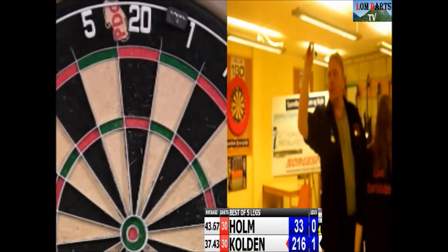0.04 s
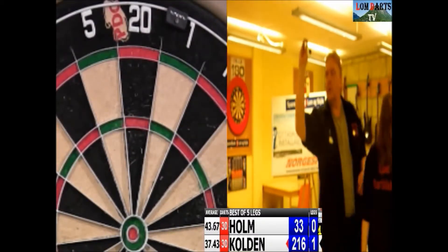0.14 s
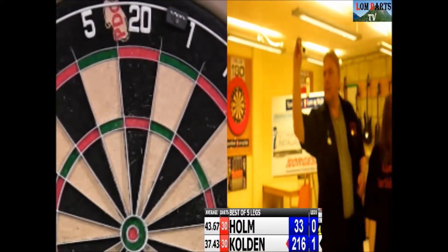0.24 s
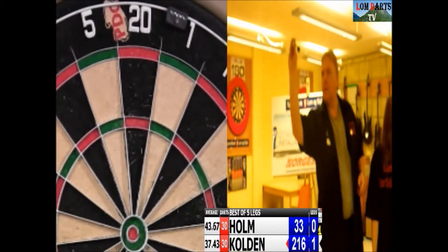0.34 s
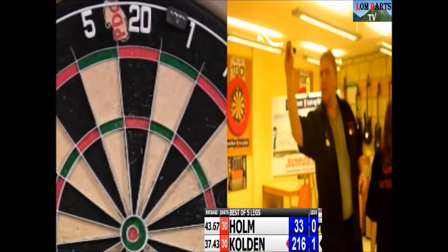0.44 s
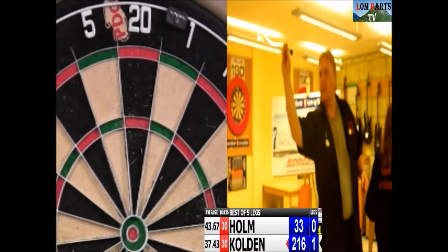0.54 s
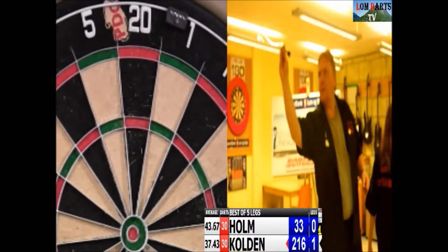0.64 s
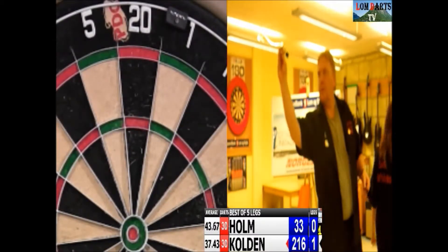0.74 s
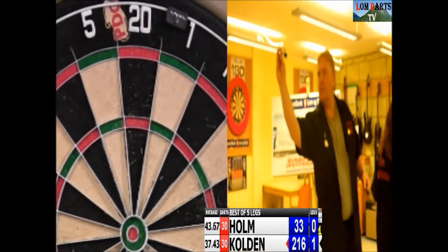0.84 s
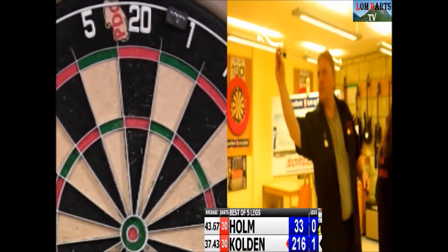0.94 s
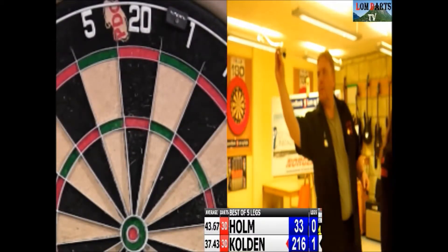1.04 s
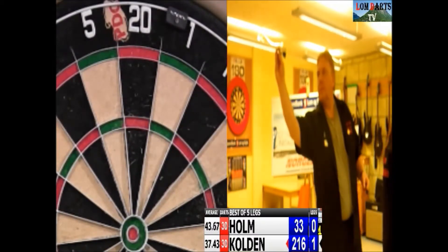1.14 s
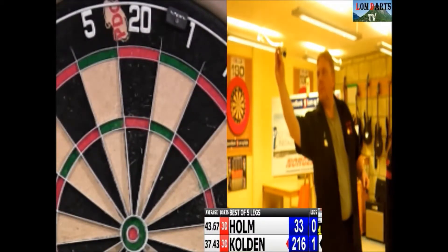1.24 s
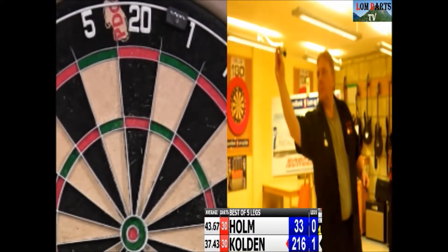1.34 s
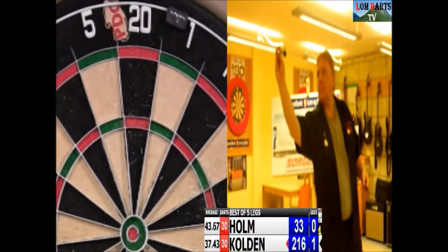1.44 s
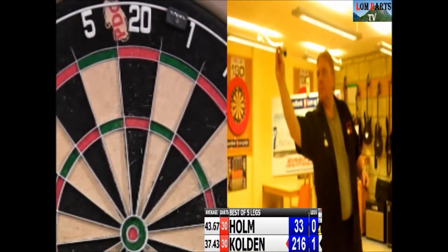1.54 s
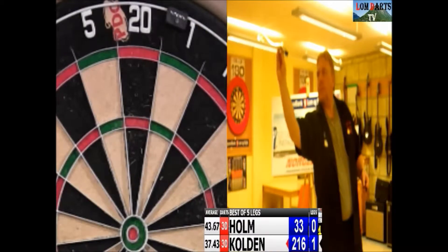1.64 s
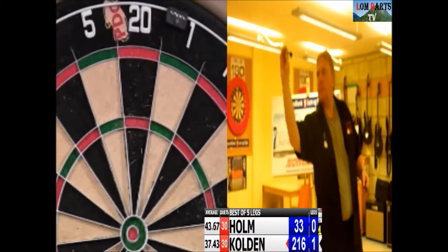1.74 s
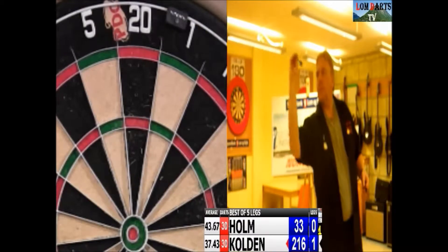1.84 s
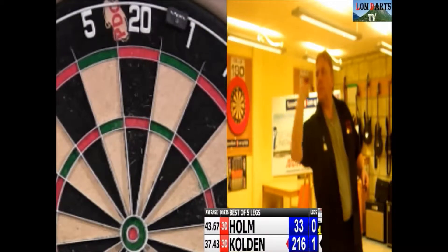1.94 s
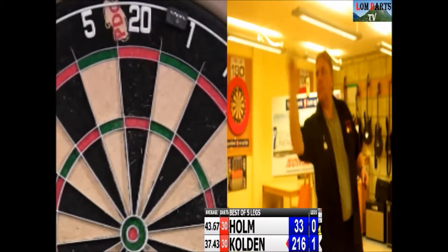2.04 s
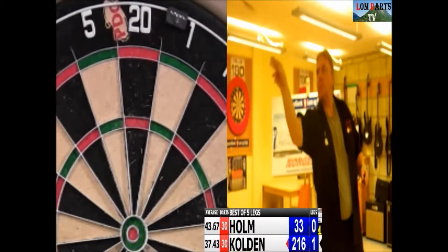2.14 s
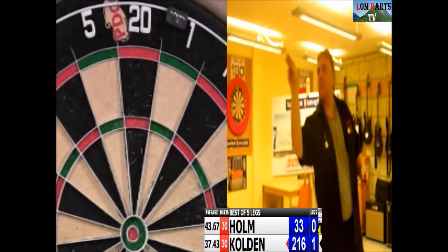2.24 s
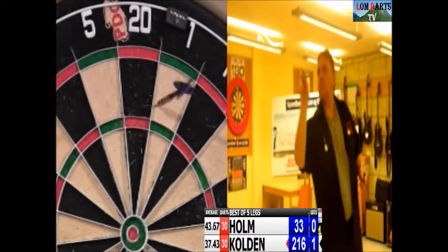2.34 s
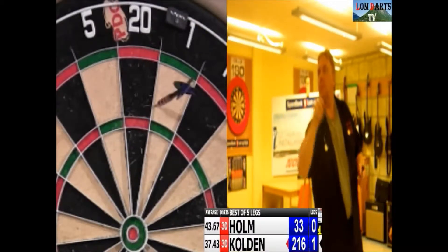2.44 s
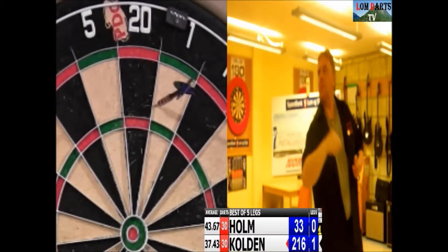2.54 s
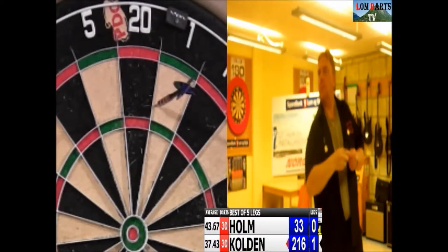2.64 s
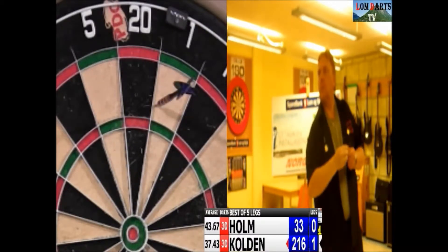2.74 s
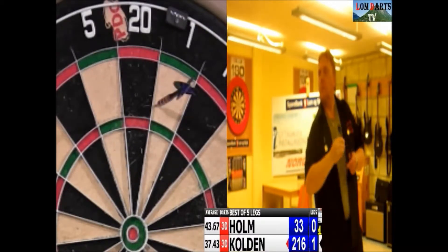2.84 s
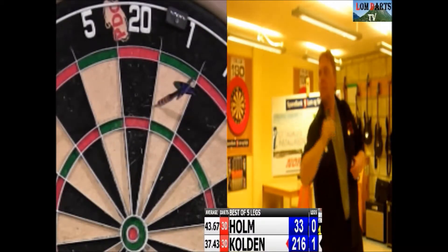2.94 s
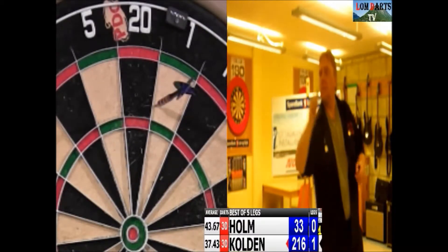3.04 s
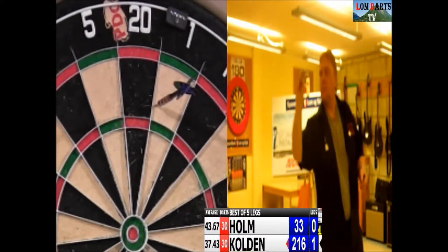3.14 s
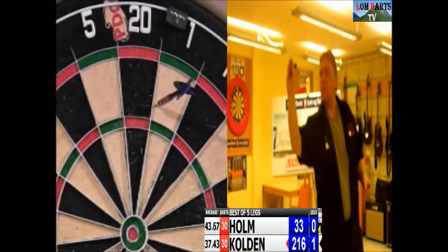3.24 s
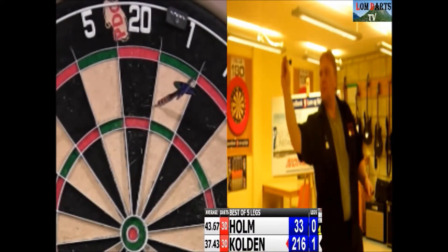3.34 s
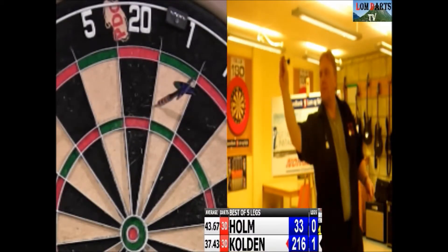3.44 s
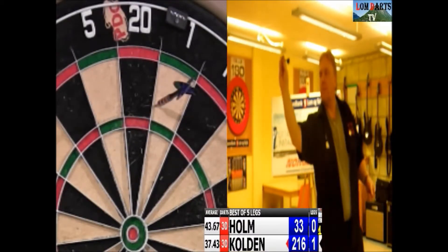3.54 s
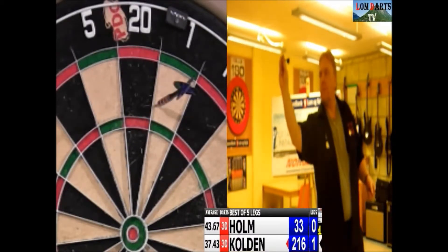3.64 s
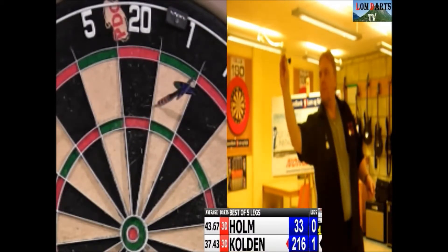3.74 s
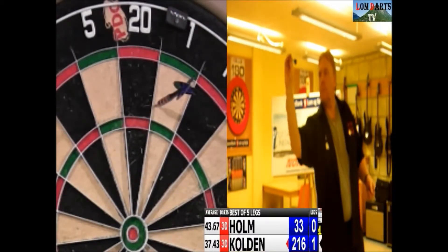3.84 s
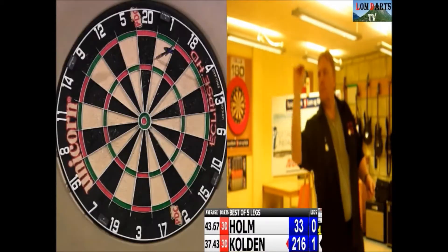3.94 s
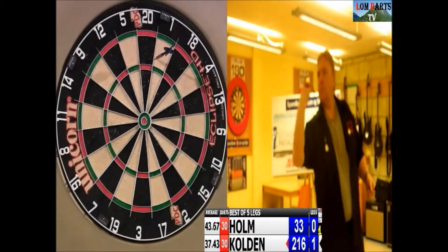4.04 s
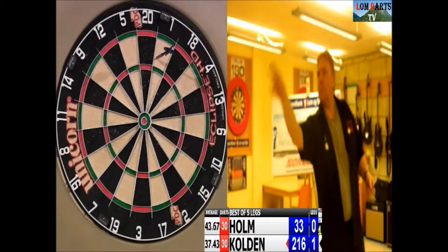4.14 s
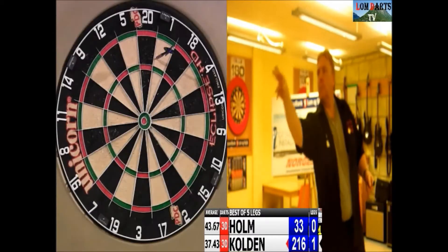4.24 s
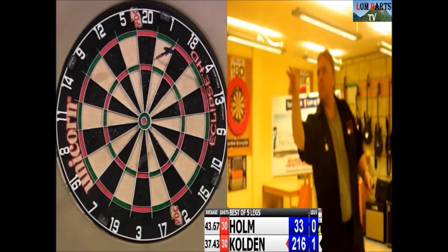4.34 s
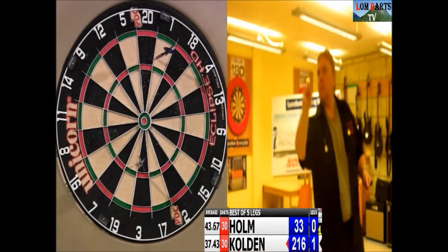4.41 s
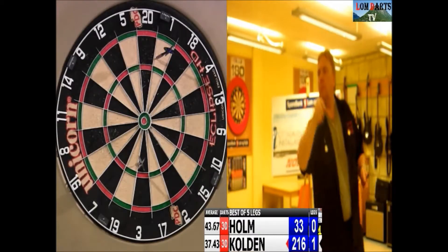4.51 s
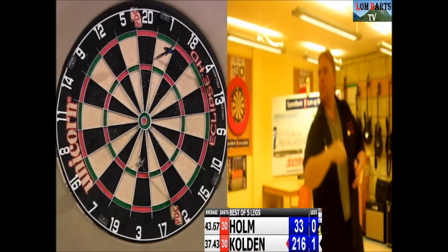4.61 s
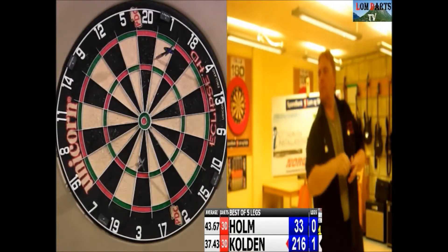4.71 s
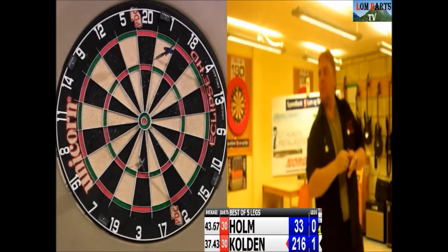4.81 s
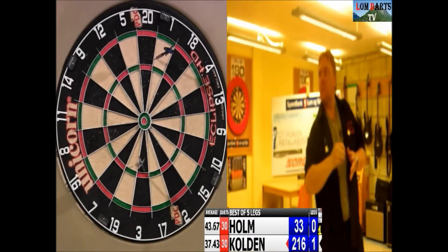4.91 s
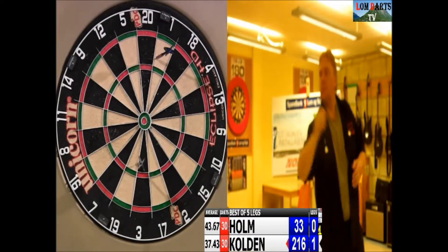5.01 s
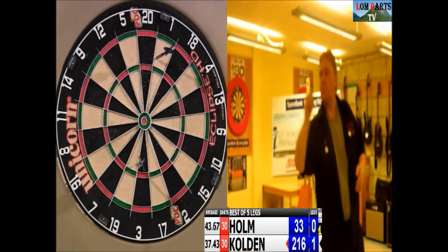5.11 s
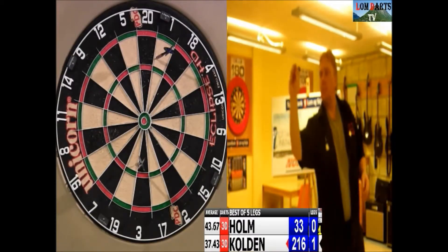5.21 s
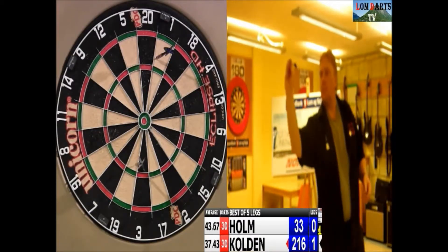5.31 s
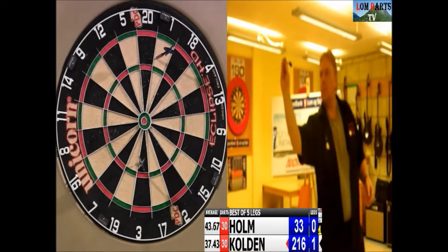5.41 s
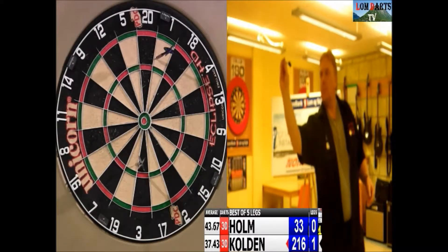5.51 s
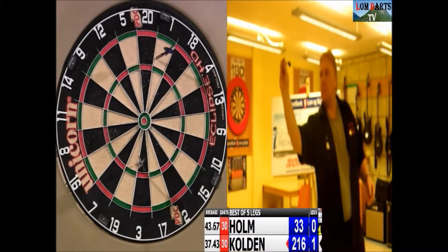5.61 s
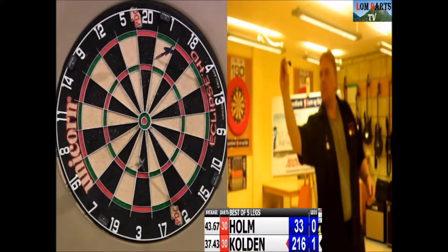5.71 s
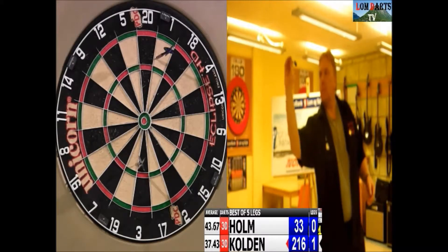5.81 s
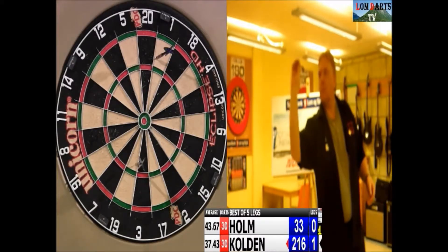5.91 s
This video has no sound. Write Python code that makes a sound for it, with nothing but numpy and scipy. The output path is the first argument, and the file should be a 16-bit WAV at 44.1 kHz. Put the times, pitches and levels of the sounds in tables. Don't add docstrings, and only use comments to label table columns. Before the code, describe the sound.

Close stereo pickup near a dartboard indoors: soft bustle and light taps settle as the thrower aims, then one loud short thock with a tiny metallic rattle and quick wall echoes. Sleeves rustle, a dart clicks in the hand, and a second thock follows with a low boom. Afterwards only fading cloth movement, faint taps, low hum and hushed room tone remain.

```python
import sys
import numpy as np
from scipy import signal
from scipy.io import wavfile

SR = 44100
rng = np.random.default_rng(int(sys.argv[2]) if len(sys.argv) > 2 else 0)


def ratio_of_db(decibels):
    return 10 ** (np.asarray(decibels, float) / 20)


def output_pcm(signal):
    pcm = np.clip(np.atleast_2d(signal).T, -1, 1) * 32767
    wavfile.write(sys.argv[1], SR, np.round(pcm).astype(np.int16))


N = 263232

LEAD = SR // 220
EDGES = 45 * 2 ** np.arange(0, 8.5, 1 / 3)
# f/Hz, left-right likeness/1
LIKENESS = [(60, 1), (180, 0.74), (530, 0.67), (1560, 0.88), (4610, 0.84), (13600, 0.38)]


def at_hz(points, hz):
    freqs, values = np.array(points).T
    return np.interp(np.log(hz), np.log(freqs), values)


def rms_one(x):
    return x / np.sqrt(np.mean(x ** 2) + 1e-20)


def butter(x, order, hz, kind="low"):
    return signal.sosfilt(signal.butter(order, hz, kind, fs=SR, output="sos"), x)


def ring(clicks, hz, t60):
    r = ratio_of_db(-60 / (t60 * SR))
    w = 2 * np.pi * hz / SR
    return signal.lfilter([0, np.sin(w)], [1, -2 * r * np.cos(w), r * r], clicks + 1e-18)


def bands(size, likeness):
    white = rng.standard_normal((2, 2, size))
    for k, (low, high) in enumerate(zip(EDGES, EDGES[1:])):
        mid, side = butter(white[k % 2], 2, [low, high], "band")
        hz = np.sqrt(low * high)
        alike = np.clip(at_hz(likeness, hz), 0, 1)
        yield hz, np.sqrt((1 + alike) / 2) * mid + np.sqrt((1 - alike) / 2) * side * [[1], [-1]]


def pan(db):
    return ratio_of_db(np.array([[db / 2], [-db / 2]]))


def dart_blow(blow_db):
    n = np.arange(SR)
    entry = ratio_of_db(-21.5) * rng.standard_normal(SR) * n / LEAD * (n < LEAD) / 4
    blow = ratio_of_db(blow_db) * (np.eye(1, SR, LEAD)[0] + entry)
    return butter(blow, 4, 3200)


def board(blow, soft_hz, k):
    # f/Hz, T60/s, level of first dart/dB, level of second dart/dB
    modes = [(85.2, .6, -28.5, -27), (151, 0.44, -20, -32), (215.5, 0.3, -17.5, -19.5),
             (261, 0.27, -7.5, -11), (307, 0.1, -9, -25), (357.5, 1, -11.5, -32), (375.7, 0.39, -3, -5),
             (406.5, 0.301, -10, 2.5), (471.4, .2, -7.5, 3), (529, 0.41, -7.5, 1), (582, 0.16, -12.5, 7),
             (657.5, 0.28, -1, -9), (720, 0.2, -19, -14), (895, 0.17, -28, 1.5), (927, 0.24, -8.5, -1.5),
             (1135, 0.14, -22, -16.5), (1195, 0.1, -6.5, -5), (1320, 0.12, -27, -8.5),
             (1756, .12, -13.5, -20), (1960, 0.125, -13, -17.5), (2306, 0.18, -18, -14.5),
             (2640, 0.1, -36, -17)]
    pulse_db, ring_db = 6.5, -5
    thud_t60_share = 0.13
    thud = ratio_of_db(pulse_db) * butter(blow, 4, soft_hz) * SR / soft_hz
    ringing = 0
    for n, (hz, t60, *db) in enumerate(modes):
        sign = (-1) ** n
        thud += sign * ratio_of_db(db[k]) * ring(blow, hz, t60 * thud_t60_share)
        ringing = ringing + sign * ratio_of_db(db[k] + ring_db) * ring(blow, hz, t60)
    return thud, ringing


def fibre_crack(blow_db, tail):
    # f/Hz, spectral level/dB per Hz
    tear_colour = [(1500, -6.5), (3000, 9), (6000, -2.5), (10000, -2), (14000, -11)]
    t = np.arange(SR) / SR
    crack = rms_one(sum(ratio_of_db(at_hz(tear_colour, hz)) * noise for hz, noise in bands(SR, LIKENESS)))
    crack *= ratio_of_db(blow_db - 11.5) * np.minimum(t / 0.0069, 1) * ratio_of_db(-60 * t / 0.039)
    return crack + ratio_of_db(-3.5) * signal.fftconvolve(crack, tail, axes=1)[:, :SR]


def wall_response(tail, tail_db, k):
    # delay t/s, level of first dart/dB, level of second dart/dB, pan/dB
    reflections = [(.0033, 3.5, -3.5, 0.5), (.0062, 4, -3.5, -0.5), (.009, -1, -6, -2.5),
                   (.0165, 0.5, -15, -4.5), (.021, -6, -15, -1.5), (0.027, -11.5, -7, 4),
                   (.032, -9, -8.5, 6), (.037, -10, -12, 3), (0.058, -15, -13, 4.5), (.070, -23, -13, 2),
                   (0.104, -25, -31, -3), (.12, -25, -28, 8)]
    response = ratio_of_db(tail_db) * tail
    response[:, 0] += 1
    for lag, *db, pan_db in reflections:
        response[:, round(lag * SR)] += ratio_of_db(db[k]) * pan(pan_db)[:, 0]
    return response


def darts(tail):
    # t/s, level/dB, contact softness f/Hz, bass through the wall/dB, tail level/dB
    throws = [
        (2.4764, -24.5, 792, -23.5, -0.7),
        (4.5283, -25, 1135, -17.5, -3),
    ]
    out = np.zeros((2, N))
    for k, (s, blow_db, soft_hz, leak_db, tail_db) in enumerate(throws):
        thud, ringing = board(dart_blow(blow_db), soft_hz, k)
        crack = fibre_crack(blow_db, tail)
        heard = signal.fftconvolve(thud[None], wall_response(tail, tail_db, k))[:, :SR]
        upper = butter(heard, 4, 263, "high")
        boom = butter(signal.fftconvolve(thud[None], tail)[:, :SR], 2, 75, "high")
        cabinet = ringing * pan(-.6)
        at = round(s * SR) - LEAD
        out[:, at:at + SR] += upper + ratio_of_db(leak_db) * boom + cabinet + crack
    return out


def rattle():
    # t/s, ring level/dB, spot struck/1 (0 front - 2 rear), tick level/dB, pan/dB
    scuff_events = [(2.4715, -50, 1.9, -52, -1.5), (2.477, -59, 1.1, -52, 2.1),
                    (2.4940, -26.5, .05, -54, 4), (2.5, -38.5, 1.95, -52, -14), (2.5090, -40, 1.5, -43, -2),
                    (2.5135, -47, 1.9, -53, -8), (2.5307, -35, .05, -42, -3), (2.5455, -52, 1.95, -39, 3),
                    (2.5525, -48, .6, -56, 1.1), (2.7437, -63, 2, -45, -3), (2.760, -60, 1.2, -61, .1),
                    (2.789, -57, .6, -49, .1), (2.931, -59, .1, -57, -7), (4.5305, -46, 1.2, -45, .1),
                    (4.533, -47, 1, -52, -4)]
    # f/Hz, T60/s
    barrel_modes = [(7200, 0.0045), (9900, 0.0062), (12800, 0.0065)]
    spot_loss_db = 9
    out = np.zeros((2, N))
    t = np.arange(SR // 20) / SR
    scuffs = rng.standard_normal((len(scuff_events), len(t))) * ratio_of_db(-60 * t / .004)
    for (s, ring_db, spot, tick_db, pan_db), scuff in zip(scuff_events, scuffs):
        tick = ratio_of_db(tick_db) * butter(scuff, 2, [4000, 13500], "band")
        for k, (hz, t60) in enumerate(barrel_modes):
            tick += ratio_of_db(ring_db - spot_loss_db * abs(k - spot) - 12.5) * ring(scuff, hz, t60)
        at = round(s * SR)
        out[:, at:at + len(t)] += tick * pan(pan_db)
    return out


def knocks():
    # t/s, peak level/dB, f/Hz, T60/s
    taps = [(0.778, -38, 1150, 0.018), (1.145, -41, 620, 0.026), (1.169, -57, 1440, 0.03),
            (1.285, -44.5, 528, 0.077), (1.339, -49, 2460, 0.033), (1.709, -38.5, 872, 0.02),
            (1.733, -48, 680, 0.046), (2.328, -43, 2240, 0.03), (3.273, -59, 693, 0.037),
            (3.791, -57, 1900, 0.024), (3.808, -55.5, 2040, 0.045), (3.839, -50.5, 1646, 0.021),
            (4.081, -54, 754, 0.026), (5.769, -63, 1230, 0.03), (5.839, -56, 647, 0.024)]
    # t/s, peak level/dB, f/Hz, T60/s
    clicks_in_hand = [
        (2.251, -51, 298, 0.11),
        (2.285, -45.5, 336, 0.067),
        (2.395, -48, 312, 0.067),
        (3.794, -44, 4050, .006),
        (3.847, -50.5, 5070, .05),
        (3.855, -45.5, 2600, 0.016),
        (4.083, -40.5, 3500, 0.0065),
        (4.256, -50.5, 414, 0.053),
    ]
    contacts = taps + clicks_in_hand
    out, click = np.zeros(N), np.eye(1, SR // 5)[0]
    spread = rng.uniform(1.1, 1.6, (len(contacts), 2))
    for (s, db, hz, t60), (a, b) in zip(contacts, spread):
        at = round(s * SR)
        body = ring(click, hz, t60)
        body -= .6 * ring(click, hz / a, t60 / 2)
        body += .5 * ring(click, hz * b, t60 / 2)
        out[at:at + len(click)] += ratio_of_db(db - 6.5) * body[:N - at]
    return out


def heel():
    # t/s, level/dB, softness f/Hz
    heel_push = (.022, -50, 68)
    # f/Hz, level/dB, T60/s
    floor_modes = [
        (123, -2.5, .3),
        (146.5, -3, .25),
        (147, -8.5, 1.2),
    ]
    s, db, soft_hz = heel_push
    push = butter(np.eye(1, N, round(s * SR))[0], 2, [soft_hz, 2.4 * soft_hz], "band")
    return sum(ratio_of_db(db + mode_db) * ring(push, hz, t60) for hz, mode_db, t60 in floor_modes)


def swell(peak_s, rise_s, fall_s):
    t = np.arange(N) / SR - peak_s
    return np.exp(-(t / np.where(t < 0, abs(rise_s), abs(fall_s))) ** 2)


def movement():
    # t/s, level/dB
    bustle_levels = [(0, -55), (0.902, -59.5), (1.5, -62), (2.1, -64), (3.3, -64), (3.68, -76.5),
                     (4.2, -67), (5.249, -67), (5.65, -76.5), (5.97, -81.5)]
    # bustle offset/dB, share of its swing/1, gesture offset/dB
    zone_levels = [
        (-15, 1.3, -22),
        (-2.5, 0.78, -7),
        (-0.13, 0.9, -0.02),
        (-6.5, 0.86, -6.5),
    ]
    # peak t/s, level/dB, rise t/s, fall t/s, brightness/dB per zone
    arm_moves = [(.01, -60.5, 0.033, 0.049, 7.5), (.12, -55.5, 0.052, 0.056, 3.5),
                 (.68, -56, 0.11, 0.12, 1), (1.15, -58, 0.019, 0.037, -4), (1.29, -67, 0.039, 0.2, 4.5),
                 (1.74, -63.5, 0.052, 0.056, -0.5), (1.87, -60.5, 0.098, 0.088, 0.5),
                 (2.32, -59, 0.11, 0.084, -1.5), (2.6, -58.5, 0.097, .1, -1.2), (2.77, -61, .06, .08, -0.2),
                 (3.04, -62, 0.085, 0.11, 3.2), (3.53, -71, .02, .07, -3.5),
                 (3.8, -63.5, 0.013, 0.052, 4.5), (3.87, -71, .04, .05, 5.5), (4.08, -66.5, .05, 0.057, 1),
                 (4.3, -61, 0.048, 0.12, 3.5), (4.84, -65, 0.12, 0.084, 1), (5.85, -66, 0.046, 0.022, -3.5),
                 (5.96, -74, .05, 0.056, -7)]
    # t/s, level/dB
    weight_shifts = [(.06, -59.5), (.17, -71), (.29, -71), (.66, -65.5), (.8, -76), (1.18, -70),
                     (1.29, -66), (1.5, -72), (2.45, -68), (2.6, -60), (4.28, -80), (4.79, -68.5)]
    mean_db = -64
    swing = np.interp(np.arange(N) / SR, *np.transpose(bustle_levels)) - mean_db
    power = np.array([ratio_of_db(mean_db + offset_db + share * swing) ** 2 for offset_db, share, _ in zone_levels])
    colour_db = np.array(zone_levels)[:, 2:]
    step = np.arange(len(zone_levels))[:, None] - 2
    for s, db, rise_s, fall_s, bright_db in arm_moves:
        power += ratio_of_db(db + colour_db + bright_db * step) ** 2 * swell(s, rise_s, fall_s)
    power[0] += sum(ratio_of_db(db) ** 2 * swell(s, .04, 0.053) for s, db in weight_shifts)
    return np.sqrt(power)


def drift(rate):
    r = np.exp(-80 * np.pi * rate / SR)
    slow = signal.lfilter([1], [1, -2 * r, r * r], rng.standard_normal(N // 40 + 2002))[2000:]
    return np.interp(np.arange(N) / 40, np.arange(len(slow)), rms_one(slow))


def background():
    zone_borders = (60, 220, 900, 3500, 14500)
    # f/Hz, spectral level/dB per Hz
    stir_colour = [(35, -38), (60, -12), (75, -10), (146, 1), (179, -3), (231, -8.5), (399, -3.5),
                   (468, -6), (512, -5), (1970, -7.5), (5620, -15), (12500, -31.5), (14000, -27)]
    # f/Hz, spectral level/dB per Hz
    tone_colour = [(56, -37), (95, -7.5), (326, -3.5), (437, -7.5), (784, -6.5), (946, -5.5), (2270, -9),
                   (10200, -23), (12100, -30.5), (14000, -42)]
    # f/Hz, rms level/dB
    hum_tones = [
        (50, -80),
        (935, -82),
    ]
    gains = movement()
    stir, tone, folds = [0] * len(gains), 0, drift(25)
    for hz, noise in bands(N, LIKENESS):
        zone = np.clip(np.searchsorted(zone_borders, hz) - 1, 0, len(gains) - 1)
        patchy_db = 0.772 * folds + 0.64 * drift(11.7)
        stir[zone] = stir[zone] + noise * ratio_of_db(at_hz(stir_colour, hz) + patchy_db)
        tone = tone + noise[:, ::-1] * ratio_of_db(at_hz(tone_colour, hz))
    t = np.arange(N) / SR
    hum = sum(np.sqrt(2) * ratio_of_db(db) * np.sin(2 * np.pi * hz * t) for hz, db in hum_tones)
    rustle = sum(gain * rms_one(x) for gain, x in zip(gains, stir))
    return rustle + ratio_of_db(-67.5) * rms_one(tone) + hum


def diffuse_tail():
    # f/Hz, T60/s
    decay_times = [(60, 0.53), (130, 0.4), (260, 0.55), (700, 0.39), (1800, 0.41), (4000, 0.3),
                   (12000, .22)]
    # f/Hz, left-right likeness/1
    tail_likeness = [(60, 0.89), (130, .99), (300, 0.97), (600, 0.97), (1200, .93), (3000, 0.98),
                     (9000, .5)]
    t = np.arange(SR) / SR
    tail = sum(noise * ratio_of_db(-60 * t / at_hz(decay_times, hz)) for hz, noise in bands(SR, tail_likeness))
    return ratio_of_db(-24) * (1 - np.exp(-t / 0.0041)) * tail


def scene():
    tail, ticks, taps = diffuse_tail(), rattle(), knocks()
    wet = signal.fftconvolve(ratio_of_db(-12) * ticks + ratio_of_db(-8) * taps, tail, axes=1)[:, :N]
    return (darts(tail) + ticks + taps + wet + heel() + background()) * pan(-.7)


def roll_off(x):
    return signal.sosfilt(signal.butter(12, 14250, fs=SR, output="sos"), x)


def record(dry):
    cut = signal.sosfilt(signal.cheby2(10, 50, 14300, fs=SR, output="sos"), dry)
    cut = butter(cut, 2, 38, "high")
    return roll_off(cut)


dry = scene()
out = record(dry)
output_pcm(out)
```